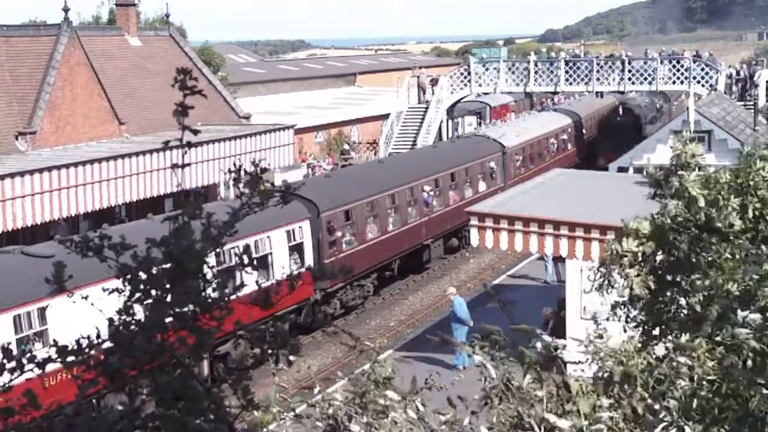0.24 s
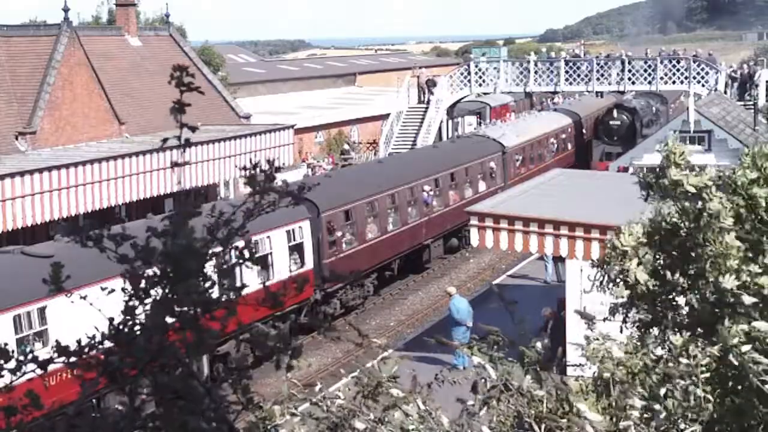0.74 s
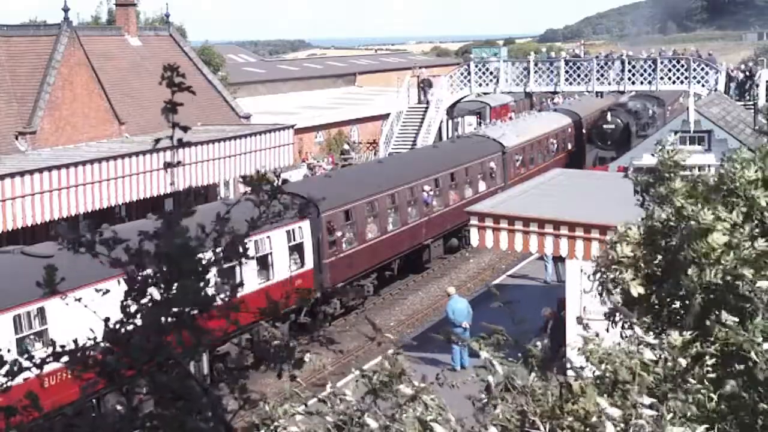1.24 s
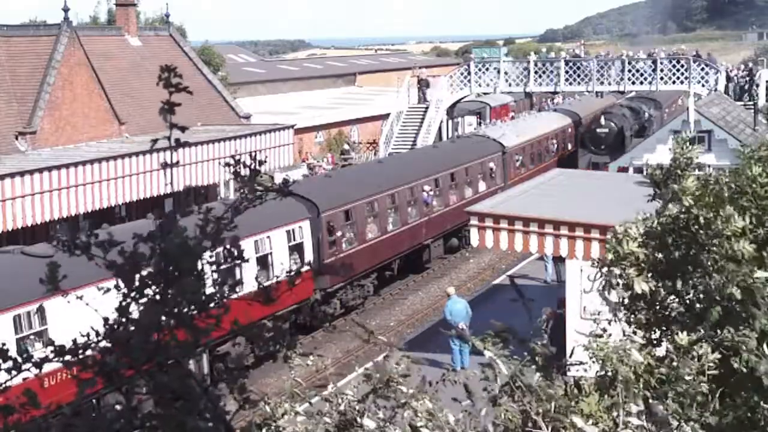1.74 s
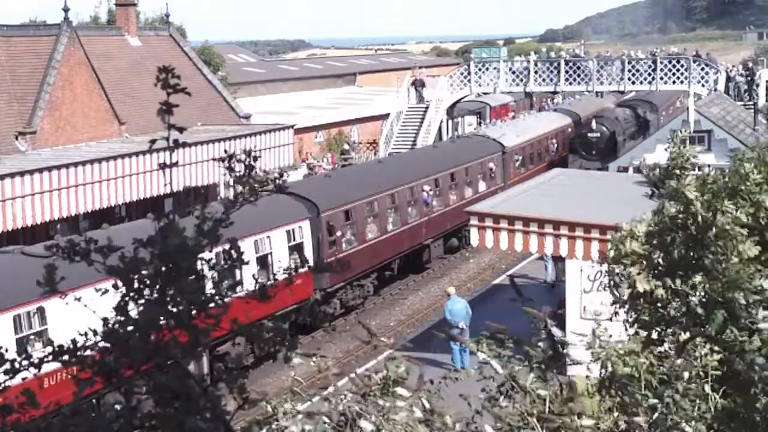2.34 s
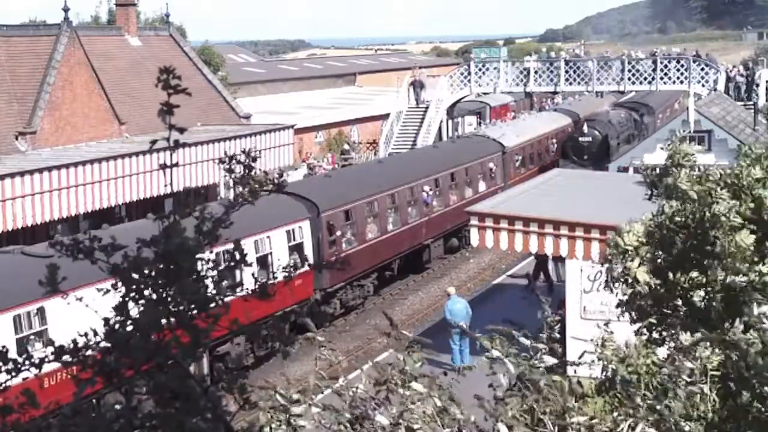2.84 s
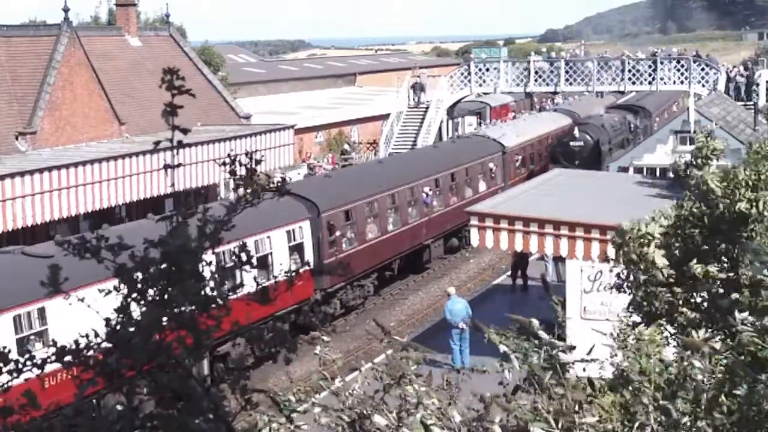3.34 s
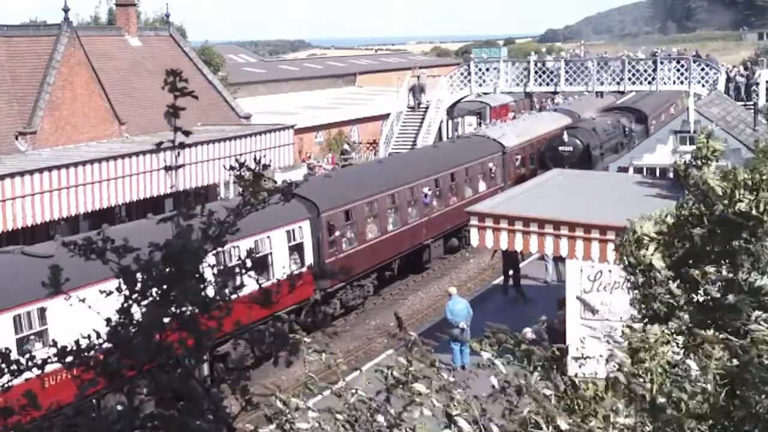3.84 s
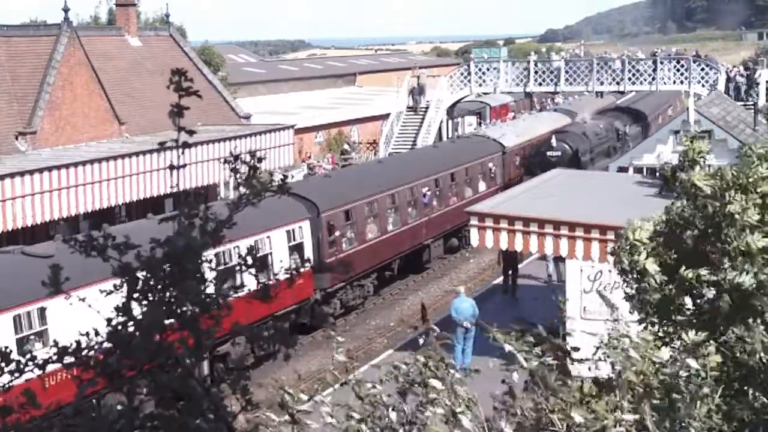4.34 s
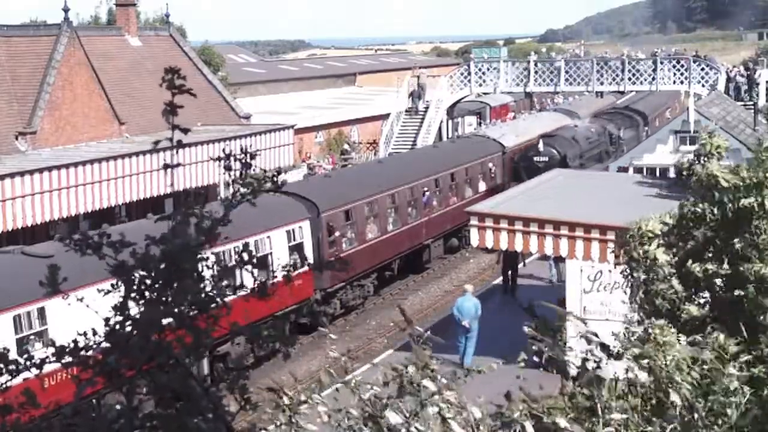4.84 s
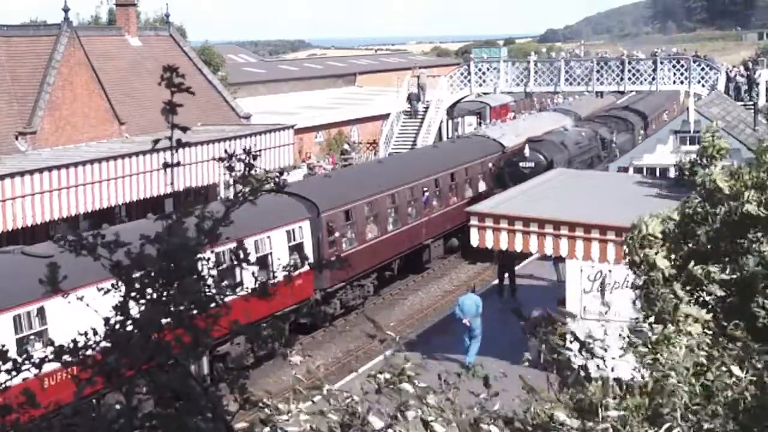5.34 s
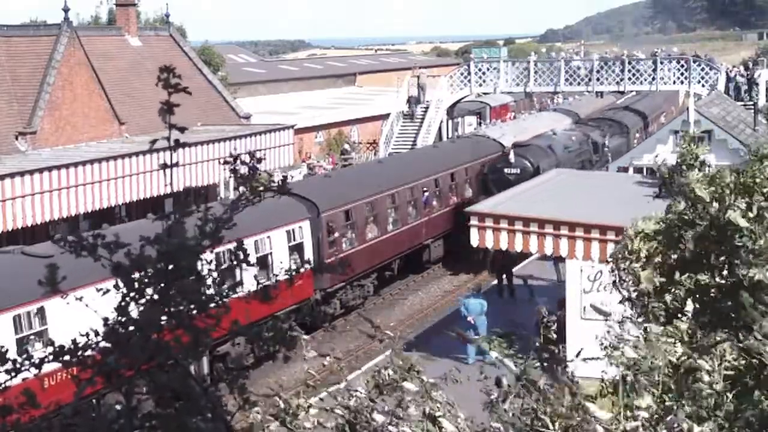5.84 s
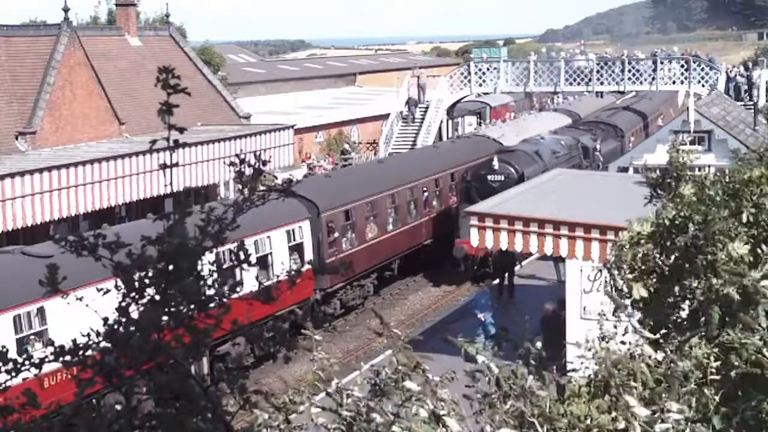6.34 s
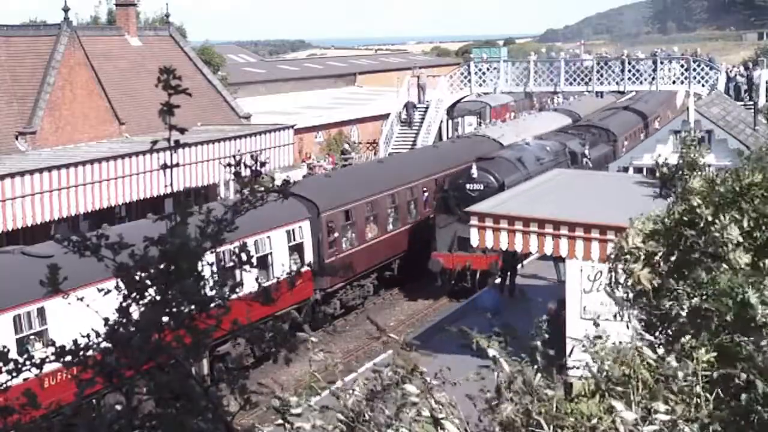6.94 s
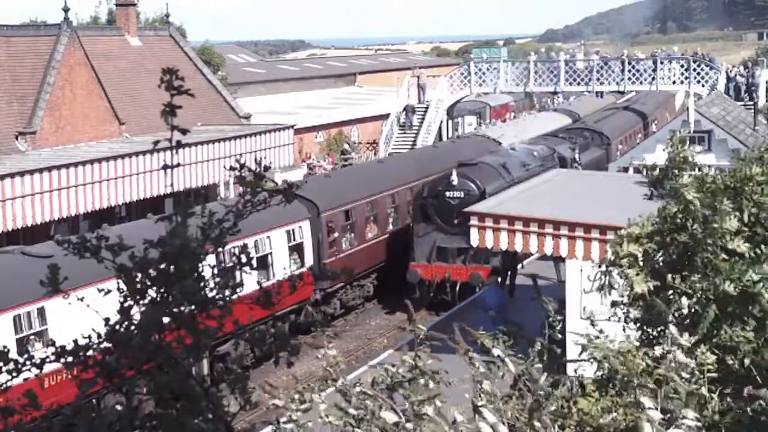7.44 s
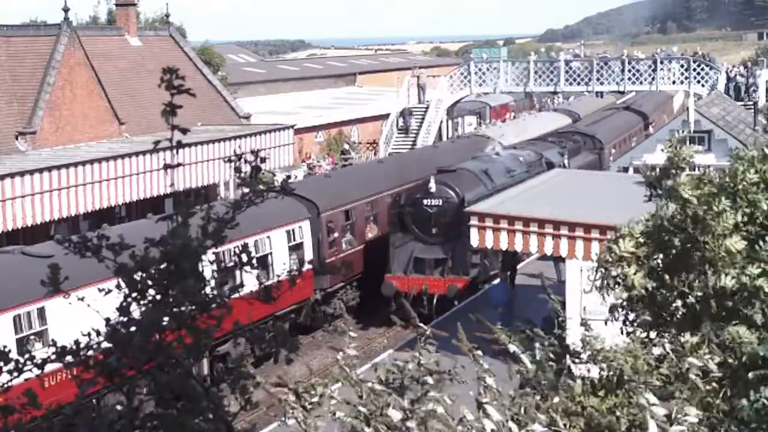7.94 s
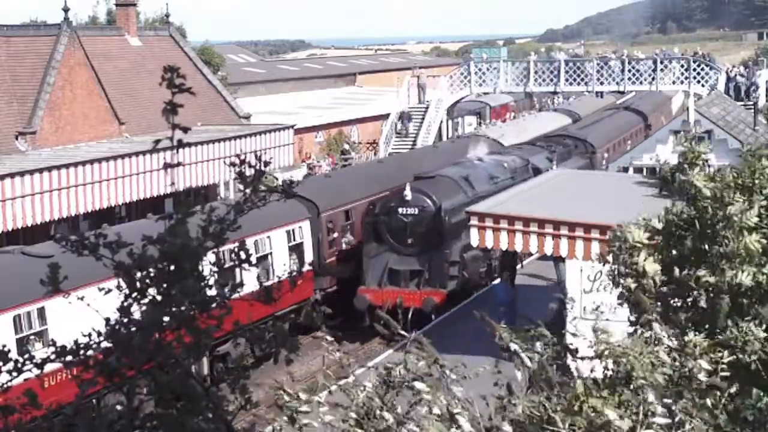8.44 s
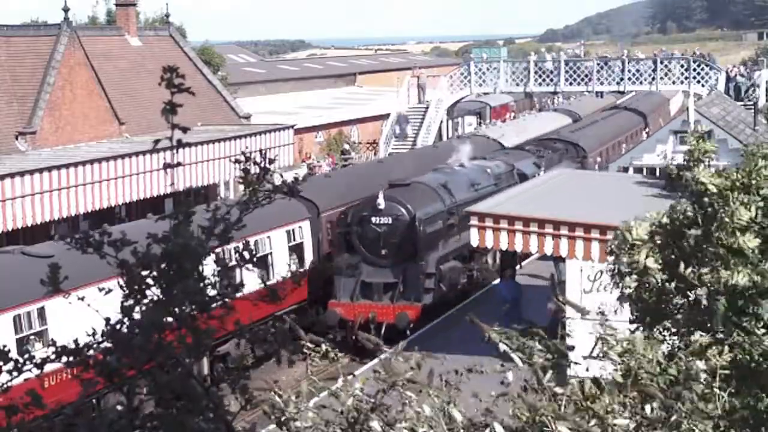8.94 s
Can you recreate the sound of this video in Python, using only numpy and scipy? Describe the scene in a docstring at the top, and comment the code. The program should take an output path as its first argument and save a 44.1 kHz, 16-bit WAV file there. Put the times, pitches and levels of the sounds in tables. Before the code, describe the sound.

A steam locomotive rolls slowly into a station, heard outdoors from a bank above the line. Steam hisses throughout, a sharp high jet over a broader, deeper rush, with three swells in the first 1.5 seconds and a thin leak that quickly fades. The hiss steps up at about 3.7 seconds, continues with brief irregular spurts, and is loudest and brightest near the end at 9 seconds. Underneath lie a low track rumble and a wavering wheel drone, which strengthens around 3.5 seconds and then sinks steadily in pitch as the train brakes. Low gusts of wind buffet the microphone, left and right separately, from the start. They are strongest between 2.4 and 3.3 seconds, briefly dominating, then weaken and stop by about 5.5 seconds, with one small puff near 9 seconds.

```python
"""Escaping steam hisses in surges from a locomotive rolling slowly into a station: a sharp jet,
a deeper spreading cloud and, at the start, a narrow leak dying away. The wheels drone at a pitch
that sinks as the train brakes, over a low track rumble. Gusts of wind buffet the two ports of a
stereo microphone separately, on a bank above the line."""
import sys
import numpy as np
from scipy import signal
from scipy.fft import rfft, irfft
from scipy.io import wavfile
from scipy.ndimage import uniform_filter1d

SR = 44100
rng = np.random.default_rng(int(sys.argv[2]) if len(sys.argv) > 2 else 0)


def unload_wav(signal):
    """Save mono or channel-first audio to the path in sys.argv[1] as 16-bit WAV at rate SR, clipped to [-1, 1]."""
    wavfile.write(
        sys.argv[1],
        SR,
        np.round(np.clip(np.atleast_2d(signal).T, -1, 1) * 32767).astype(np.int16),
    )


N = 405279
FRAME, HOP = 512, 128  # samples
TIME_S = np.arange(N) / SR
FRAME_TIME_S = np.arange(N // HOP + 6) * HOP / SR

# Jet spectrum: (frequency [Hz], relative density [dB])
JET_SPECTRUM = [(2650, -32), (4500, -6.5), (6400, 0), (7200, 2.5), (7750, 6.5), (8300, 4), (9300, -1),
                (11000, -9.5), (13500, -19), (15200, -36)]
# Cloud spectrum: (frequency [Hz], relative density [dB])
CLOUD_SPECTRUM = [(880, -21), (1550, -8.5), (1820, -9.5), (2030, 0.5), (2260, -4), (3000, 0.5), (3900, 2),
                  (4070, 7), (4250, 1), (6000, -6.5), (7800, -17)]
# Leak spectrum: (frequency [Hz], relative density [dB])
LEAK_SPECTRUM = [(3000, -18), (3750, -1), (4600, -25)]
# Steady escape: (time [s], jet level [dB], cloud level [dB])
STEAM_LEVELS = [(0.0, -41.5, -37.5), (0.3, -34.5, -37.5), (0.8, -37, -40.5), (1.3, -35.5, -37),
                (1.7, -31, -37), (2.3, -36.5, -35.5), (2.75, -34.5, -40.5), (3.05, -35.5, -40.5),
                (3.6, -31, -35.5), (3.8, -26.5, -33.7), (5.0, -30.5, -33.5), (5.7, -26.0, -32),
                (6.6, -28.5, -35), (7.5, -28.5, -34), (8.45, -28.5, -34), (9.19, -24, -30)]
# Surges: (centre [s], length [s], jet rise [dB], cloud rise [dB])
STEAM_SURGES = [(0.512, 0.23, 6, 3.5), (1.087, 0.25, 5.5, 4), (1.45, 0.27, 8, 6.5), (2.362, 0.088, 3.5, -1),
                (2.889, 0.16, 3.5, 3), (3.257, 0.4, 4.5, 4), (3.297, 0.068, 1.5, 3), (3.7, 0.071, 4, 0.5),
                (3.957, 0.046, 4.5, 0.5), (4.207, 0.043, 0.5, 4), (4.57, 0.09, 3.5, 1),
                (5.068, 0.069, 5, -0.5), (5.426, 0.061, 6.0, 3), (5.583, 0.045, 1.5, -0.5),
                (5.852, 0.06, 3, 2), (6.397, 0.038, 5, 2), (6.96, 0.046, 2.5, 0), (7.29, 0.21, 1.5, 1.5),
                (7.743, 0.047, 6.5, 2), (7.788, 0.05, 2, 1), (8.1, 0.22, 4, 0.4), (8.719, 0.22, 4, 1),
                (8.91, 0.11, 5.5, 1)]


def steam():
    """Jet and cloud hiss, with flat-topped surges on their steady levels; a narrow leak fades."""
    centre_s, length_s, jet_rise_db, cloud_rise_db = np.transpose(STEAM_SURGES)
    surges = np.exp(-event_distance(centre_s, length_s) ** 3.4)
    jet_db, cloud_db = follow(STEAM_LEVELS, TIME_S)
    jet_db += to_samples(surges @ jet_rise_db)
    cloud_db += to_samples(surges @ cloud_rise_db)
    leak_db = -39 - 23 * TIME_S
    jet = distant_noise(JET_SPECTRUM, jet_db, flicker_db=0.89, flicker_hz=42, patch_db=1.5)
    cloud = distant_noise(CLOUD_SPECTRUM, cloud_db, flicker_db=0.8, flicker_hz=38, patch_db=1.06)
    leak = distant_noise(LEAK_SPECTRUM, leak_db, flicker_db=1.1, flicker_hz=13, patch_db=0.6)
    return jet + cloud + leak


# Rolling wheels: (time [s], drone pitch [Hz], drone level [dB], rumble level [dB])
WHEEL_ROLL = [(0, 55.6, -42.5, -44), (2, 59.76, -48, -40.5), (3.5, 57.54, -33.5, -37.5),
              (4.5, 54.84, -38, -38), (5.43, 51.47, -39.5, -38), (6.27, 50.7, -33.5, -38.5),
              (7.1, 45.9, -33, -37.5), (8.04, 40.96, -35, -37.5), (8.6, 37.74, -33.5, -36),
              (9.19, 33.45, -37, -34.5)]
# Track rumble: (frequency [Hz], relative density [dB])
RUMBLE_SPECTRUM = [(30, -17), (65, -8), (130, -13), (200, -12), (223, -3.5), (236, -13), (365, -19.5),
                   (394, -14.5), (420, -20), (447, -13), (490, -17.5), (540, -20.5), (720, -21),
                   (1000, -19), (1780, -26), (2600, -41), (4400, -100)]


def wheels():
    """A wavering drone sinks with the train's speed, over the rumble of the track."""
    pitch_hz, drone_db, rumble_db = follow(WHEEL_ROLL, TIME_S)
    waver, throb = map(to_samples, wander(2, rate_hz=3.1))
    phase_rad = 2 * np.pi * np.cumsum(pitch_hz * (1 + 0.02 * waver)) / SR
    drone = np.sqrt(2) * gain_of(drone_db + 3 * throb) * np.sin(phase_rad)
    pan = gain_of([[-0.25], [0.25]])
    rumble = distant_noise(RUMBLE_SPECTRUM, rumble_db, flicker_db=-0.1, flicker_hz=4.7,
                           patch_db=0.74, frame=4 * FRAME)
    return pan * drone + rumble


# Puffs: (centre [s], port [-1 left, 1 right], length [s], strength [dB before buffet's scaling])
WIND_PUFFS = [(0.15, -1, 0.19, -35), (0.302, 1, 0.021, -29.0), (0.633, 1, 0.033, -32.0),
              (0.773, 1, 0.31, -36.0), (0.787, -1, 0.058, -26.0), (0.941, -1, 0.073, -22.5),
              (0.939, 1, 0.062, -29.5), (1.029, -1, 0.13, -29), (1.234, 1, 0.061, -31),
              (1.292, -1, 0.12, -24.5), (1.315, 1, 0.068, -19), (1.406, -1, 0.081, -30.0),
              (1.67, 1, 0.079, -29.0), (1.738, -1, 0.16, -33.5), (1.852, 1, 0.055, -26.0),
              (1.865, -1, 0.037, -26.5), (2, 1, 0.14, -30.0), (2.228, 1, 0.1, -29.0), (2.339, 1, 0.03, -22),
              (2.4, 1, 0.059, -29), (2.432, -1, 0.13, -17.5), (2.469, 1, 0.076, -23),
              (2.51, -1, 0.059, -17), (2.554, 1, 0.06, -18), (2.563, -1, 0.03, -13.5),
              (2.619, 1, 0.05, -14), (2.628, -1, 0.099, -11), (2.714, 1, 0.06, -8.5), (2.733, -1, 0.07, -8),
              (2.758, 1, 0.04, -16), (2.79, -1, 0.044, -14), (2.81, 1, 0.06, -8), (2.891, -1, 0.1, -23),
              (2.913, 1, 0.071, -10), (2.972, 1, 0.03, -15), (3.019, 1, 0.043, -13.5),
              (3.085, 1, 0.079, -12), (3.11, -1, 0.12, -27), (3.176, 1, 0.03, -17), (3.26, 1, 0.059, -16),
              (3.338, -1, 0.19, -28), (3.345, 1, 0.082, -19), (3.421, 1, 0.037, -21),
              (3.519, 1, 0.047, -21.5), (3.54, -1, 0.045, -28.0), (3.629, 1, 0.2, -31),
              (3.682, -1, 0.098, -28), (3.94, -1, 0.044, -28.0), (3.953, 1, 0.053, -27.5),
              (4.05, -1, 0.085, -29.0), (4.404, 1, 0.02, -15), (4.6, 1, 0.12, -32), (4.7, -1, 0.05, -31),
              (5.047, -1, 0.04, -28.5), (5.206, 1, 0.099, -29.5), (5.341, 1, 0.074, -28.5),
              (5.378, -1, 0.025, -29), (8.829, 1, 0.04, -31.5), (8.919, -1, 0.063, -33),
              (8.926, 1, 0.07, -25.5)]


def wind():
    """At each port, overlapping puffs add their power to the calm air."""
    centre_s, port, length_s, strength = np.transpose(WIND_PUFFS)
    puff_power = gain_of(strength - 5 * event_distance(centre_s, length_s) ** 2.5) ** 2
    calm_power = gain_of(-46) ** 2
    port_powers = [puff_power @ side + calm_power for side in (port < 0, port > 0)]
    return np.array([buffet(10 * np.log10(power)) for power in port_powers])


# Eddies at unit air speed: (frequency [Hz], relative density [dB])
EDDY_SPECTRUM = [(20, 0.5), (150, 1.5), (300, -2), (600, -10), (1000, -20.5), (1500, -32.5), (2500, -40),
                 (5000, -63)]


def buffet(gust_strength):
    """A frozen row of eddies is dragged past one port: faster air is louder and higher."""
    strength = to_samples(gust_strength + 2.3 * wander(1, rate_hz=30.11)[0])
    speed = np.clip(gain_of(0.72 * (strength + 12)), 0.05, 2)
    eddy_gain = gain_of(at_frequency(EDDY_SPECTRUM, np.fft.rfftfreq(N, 1 / SR)))
    eddies = unit_rms(irfft(rfft(rng.standard_normal(N)) * eddy_gain, N))
    pressure = unit_rms(eddies - 0.22 * (eddies ** 2 - 1))  # suction peaks are sharper
    passing = np.interp(np.cumsum(speed), np.arange(N), pressure)
    vent = signal.butter(2, 38, "high", fs=SR, output="sos")  # the capsule vents slow pressure
    return gain_of(0.72 * strength - 3) * signal.sosfilt(vent, passing)


# Air absorption, easing as the engine nears: (time [s], loss at 12.25 kHz [dB])
TREBLE_LOSS = [(0, 9), (9.19, 0.5)]


def distant_noise(spectrum, level_db, flicker_db, flicker_hz, patch_db, frame=FRAME):
    """Stereo noise with broadband flicker and drifting spectral patches, dulled by the air."""
    stride = frame // FRAME
    hz = np.fft.rfftfreq(frame, 1 / SR)[:, None]
    patches = unit_rms(uniform_filter1d(wander(len(hz), rate_hz=8), size=7 * stride, axis=0))
    flicker = wander(1, flicker_hz)
    flicker = unit_rms(flicker - uniform_filter1d(flicker, size=48))  # quick changes only
    field_db = at_frequency(spectrum, hz) + flicker_db * flicker + patch_db * patches
    field_db -= follow(TREBLE_LOSS, FRAME_TIME_S)[0] * np.maximum((hz / 8660) ** 2 - 1, 0)
    sound = port_pair(field_db[:, ::stride], hz, frame)
    return gain_of(level_db) * sound / np.sqrt(np.mean(sound.mean(0) ** 2))


# Likeness of the ports: (frequency [Hz], coherence [0-1])
PORT_COHERENCE = [(100, .98), (500, .95), (1700, .72), (2700, .96), (3300, .98), (4120, .76), (7600, .4),
                  (8700, .5), (10100, .38), (12000, .72)]
# Port balance: (frequency [Hz], left minus right [dB])
PORT_BALANCE = [(500, -.6), (1770, 2), (2700, .4), (5000, 3.5), (7000, 4.5), (7800, 10.5), (8500, 3),
                (9300, -3), (11000, 0)]
# Port phase: (frequency [Hz], left lead [rad])
PORT_PHASE = [(600, 0), (1380, .5), (2300, 0), (7240, 0), (8500, -1.5), (10100, -.2)]


def port_pair(field_db, hz, frame):
    """Noise under a time-frequency level field reaches two ports, partly coherent."""
    coherence = at_frequency(PORT_COHERENCE, hz)
    balance_db = at_frequency(PORT_BALANCE, hz)
    draws = rng.standard_normal((field_db.shape[-1], len(hz), 4)).T
    left, independent = draws[::2] + 1j * draws[1::2]
    right = coherence * left + np.sqrt(1 - coherence ** 2) * independent
    right *= np.exp(-1j * at_frequency(PORT_PHASE, hz))
    spectra = np.array([left * gain_of(balance_db / 2), right * gain_of(-balance_db / 2)])
    return signal.istft(spectra * gain_of(field_db), nperseg=frame, noverlap=frame * 3 // 4)[1][:, :N]


def gain_of(db):
    return 10 ** (np.asarray(db) / 20)


def unit_rms(x):
    return x / np.sqrt(np.mean(x ** 2) + 1e-20)


def to_samples(frame_values):
    return np.interp(TIME_S, FRAME_TIME_S, frame_values)


def at_frequency(table, hz):
    """Table value, interpolated over log frequency."""
    knots_hz, values = np.transpose(table)
    return np.interp(np.log(hz + 1), np.log(knots_hz + 1), values)


def follow(table, time_s):
    """Each value column, interpolated over time."""
    knots_s, *columns = np.transpose(table)
    return [np.interp(time_s, knots_s, column) for column in columns]


def wander(count, rate_hz):
    """Rows of low-passed noise at frame rate, rms 1."""
    white = rng.standard_normal((len(FRAME_TIME_S), count)).T
    pole = np.exp(-2 * np.pi * rate_hz * HOP / SR)
    return unit_rms(signal.filtfilt([1 - pole], [1, -pole], white))


def event_distance(centre_s, length_s):
    """Distance of each frame from each event's centre, 1 at its ends."""
    return abs(FRAME_TIME_S[:, None] - centre_s) / (length_s / 2)


def scene():
    return steam() + wheels() + wind()


def record(dry):
    """The preamplifier rounds off the hardest gusts; a low-pass limits the band."""
    ceiling, cutoff_hz = 0.7, 15250
    rounded = ceiling * np.tanh(dry / ceiling)
    low_pass = signal.firwin(1023, cutoff_hz, window=("kaiser", 9), fs=SR)
    return signal.oaconvolve(rounded, low_pass[None], "same")


dry = scene()
out = record(dry)
unload_wav(out)
```